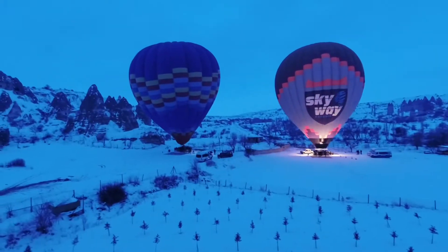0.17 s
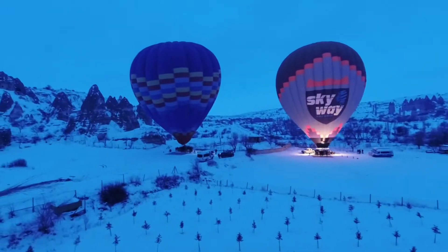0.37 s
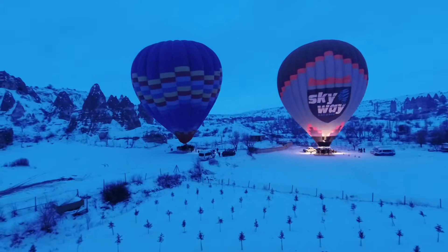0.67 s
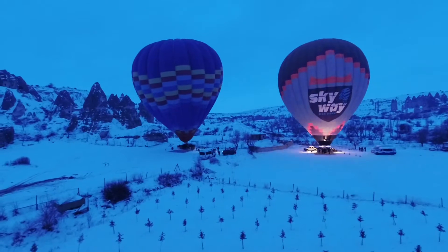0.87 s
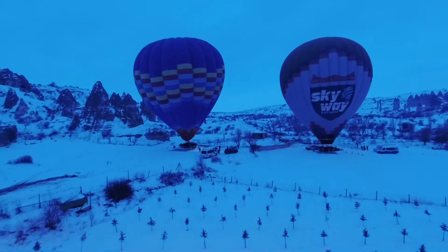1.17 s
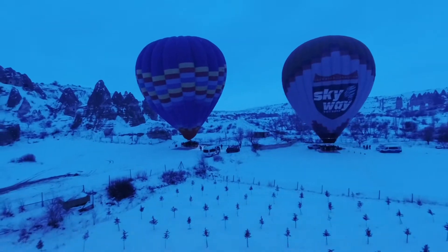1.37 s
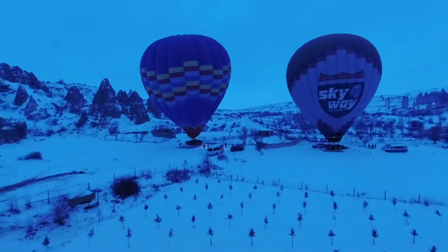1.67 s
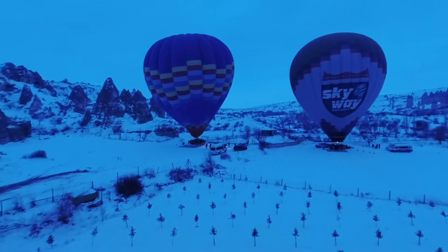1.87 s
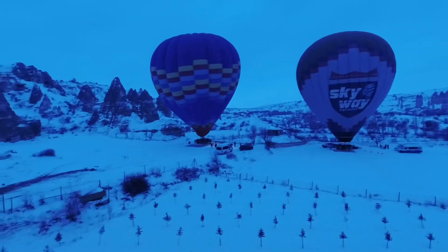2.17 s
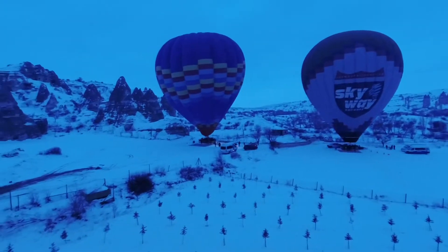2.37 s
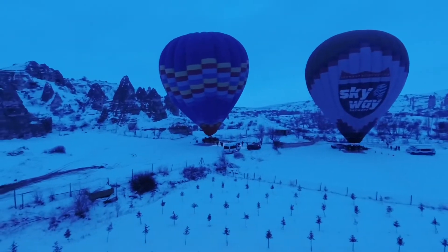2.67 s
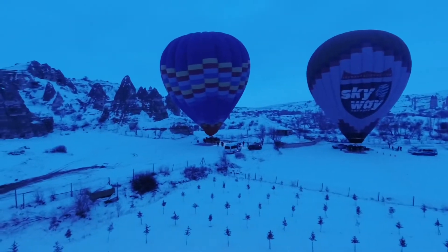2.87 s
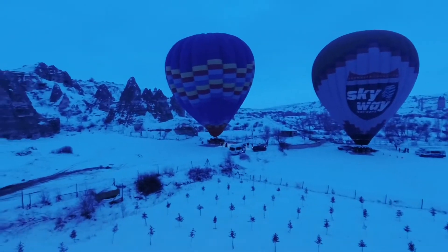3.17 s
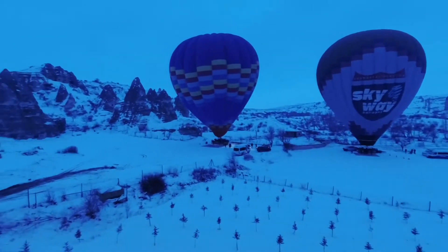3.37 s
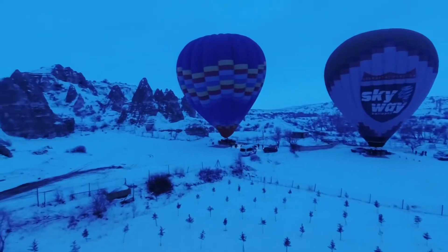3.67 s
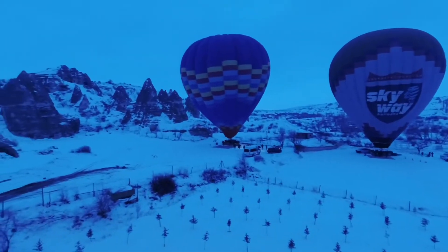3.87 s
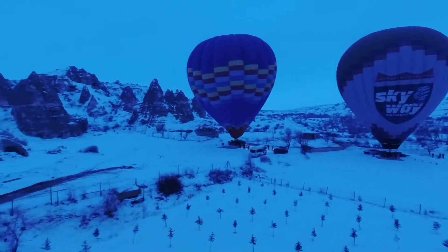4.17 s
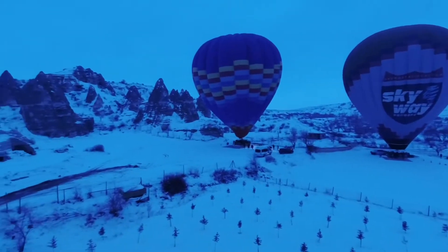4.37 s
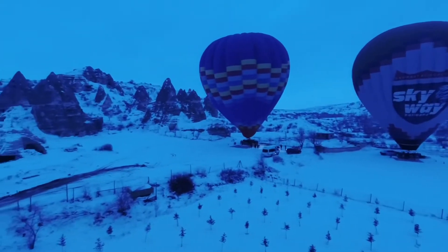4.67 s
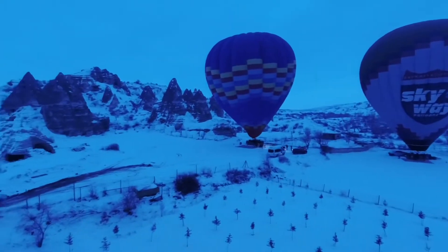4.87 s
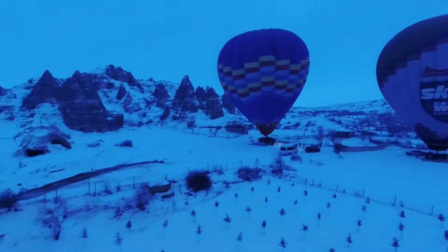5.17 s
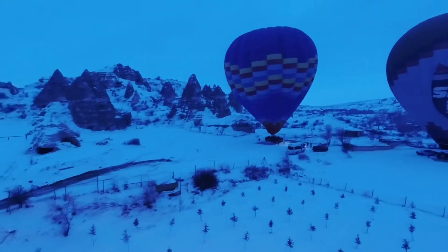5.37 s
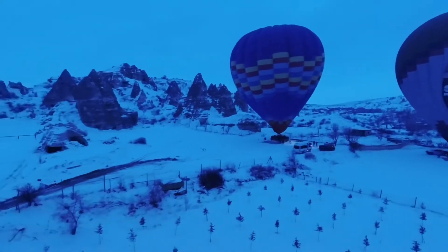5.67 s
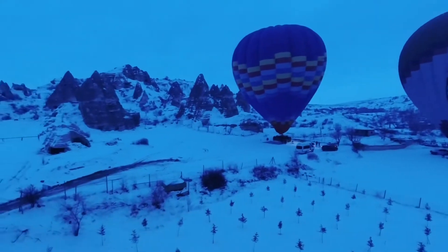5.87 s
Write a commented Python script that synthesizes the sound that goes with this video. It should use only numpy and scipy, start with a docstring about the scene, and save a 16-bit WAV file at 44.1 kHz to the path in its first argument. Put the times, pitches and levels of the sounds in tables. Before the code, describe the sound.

A balloon's gas burner roars outdoors with rumbling flame and hissing jets, eases, surges back harder twice, then cuts off abruptly to faint airy noise.

```python
"""A hot-air balloon burner blasts: a rumbling, roaring flame over the rush and hiss of its propane jets.
The blast eases, comes back harder twice, then is cut off; a faint, whistling noise bed follows.
Flame and jets are shaped noise on drawn level curves; gusts are short swells of uneven sine cycles.
The howl is a narrow noise band that sinks. Direct sound reaches the left microphone first;
an inverted near echo hollows out the roar."""
import sys
import numpy as np
from scipy import signal
from scipy.fft import rfft, irfft, next_fast_len
from scipy.io import wavfile
from scipy.ndimage import uniform_filter1d, map_coordinates

SR = 44100
rng = np.random.default_rng(int(sys.argv[2]) if len(sys.argv) > 2 else 0)


def pcm_store(signal):
    """Save signal as 16-bit PCM."""
    levels = np.round(np.clip(np.atleast_2d(signal), -1, 1) * 32767)
    wavfile.write(sys.argv[1], SR, levels.astype(np.int16).T)


N = 264820


# plume heave curve: time_s, curve_db
PLUME_HEAVE = [(0.0, -28.5), (0.3, -31), (1.9, -32.5), (2.2, -30.5), (2.64, -31.5), (2.9, -27.5),
               (3.5, -28.5), (3.8, -34), (4.2, -30), (4.63, -30), (4.91, -30), (5.31, -33.5), (5.92, -36.5)]
# layer spectra, only their shape counts: freq_hz, density_db_per_hz
HEAVE_SPECTRUM = [(10, -36), (22, -6), (32, -3), (43, 0.5), (62, 1.5), (85, -9), (130, -4.5), (300, -80)]
BOOM_SPECTRUM = [(40, -27), (80, -11), (105, 2.5), (125, 2.5), (155, 1), (200, -12), (260, -32), (700, -73)]
RUMBLE_SPECTRUM = [(80, -56), (180, -6), (220, -3.5), (265, 1), (315, -1.5), (380, -9), (470, -17.5),
                   (1200, -118)]
ROAR_SPECTRUM = [(150, -36), (330, 0), (430, 3.5), (550, 3), (660, -1), (730, -3), (800, -7.5), (1000, -36),
                 (2200, -84)]
RASP_SPECTRUM = [(400, -75), (800, 0.5), (870, 1.5), (940, -3.5), (1050, 3), (1160, -3.5), (1270, -2.5),
                 (1370, -15), (1600, -9.5), (3000, -82)]
RASP_FADES_DB_PER_S = 0.56  # as the listener drifts round the burner


def flame(size_db, vigour_db, force_db, flow_db):
    """Uneven burning: the plume heaves, large eddies boom and rumble, small ones roar and rasp."""
    flutter = wobble(35)
    heave_db = curves(PLUME_HEAVE)[0] - 0.3 + 0.75 * wobble(19)
    heave = amp(heave_db) * steadied(turbulence(HEAVE_SPECTRUM, patchy_db=-2.0), span_s=0.2)

    boom_db = -28.9 + 1.13 * size_db + 0.046 * flow_db + 0.15 * wobble(12) + 0.8 * flutter
    boom = amp(boom_db) * steadied(turbulence(BOOM_SPECTRUM, patchy_db=1.0), span_s=0.17)

    rumble_db = -29.6 + 0.85 * size_db + 0.2 * vigour_db - 0.09 * flow_db
    rumble_db = rumble_db + 1.33 * wobble(6.6) + 0.66 * flutter
    rumble = amp(rumble_db) * steadied(turbulence(RUMBLE_SPECTRUM, patchy_db=0.5), span_s=0.133)

    roar_db = -33.2 + 0.92 * vigour_db + 0.19 * flutter
    echoed_roar = near_echo(turbulence(ROAR_SPECTRUM, patchy_db=2.3))
    roar = amp(roar_db) * steadied(echoed_roar, span_s=0.12)

    rasp_db = -44.4 + 0.1 * size_db + 0.37 * vigour_db + 0.49 * force_db
    rasp_db = rasp_db + surges() - RASP_FADES_DB_PER_S * drift_s() + 0.5 * flutter
    rasp = amp(rasp_db) * steadied(turbulence(RASP_SPECTRUM, patchy_db=2.5), span_s=0.12)
    return heave + boom + rumble + roar + rasp


# harsh surges: start_s, scale_db (before attack and decay; a 0 dB row adds nothing)
SURGES = [(2.01, 2), (2.88, 4.5), (4.48, 0)]
SURGE_ATTACK_S, SURGE_DECAY_S = 0.058, 0.44


def surges():
    """Extra dB of brief harsh surges that rise and die away."""
    extra_db = np.zeros(N)
    for start_s, scale_db in SURGES:
        age_s = np.maximum(time_s() - start_s, 0)
        attack = 1 - np.exp(-age_s / SURGE_ATTACK_S)
        extra_db += scale_db * attack * np.exp(-age_s / SURGE_DECAY_S)
    return extra_db


# single large eddies: centre_s, pitch_hz, level_db (rms at the crest)
GUSTS = [(0.06, 289, -26), (0.07, 44, -26), (0.24, 292, -28.5), (0.72, 50.3, -27), (0.84, 266, -26.5),
         (0.97, 123, -32.5), (1.15, 116.7, -25), (1.473, 56, -27), (2.04, 55.4, -27), (2.13, 147, -28.5),
         (2.32, 54, -27), (2.83, 133.6, -24), (2.88, 36, -26), (2.98, 44, -25), (3.15, 240, -22.5),
         (3.49, 133, -23), (4.09, 40, -24.5), (4.1, 128, -32), (4.229, 96, -27), (4.481, 38, -31),
         (4.57, 44, -28), (4.6, 223.6, -28), (4.71, 155, -22), (4.75, 45, -40), (4.88, 140, -22.5),
         (5.22, 50, -30.5), (5.3, 109, -25.5), (5.41, 74.6, -23)]
GUST_HALF_S = 0.0793  # crest to silence, either side
GUST_STRAY_RAD, GUST_STRAYS_PER_CYCLE = 1, 0.388


def gusts():
    """Large eddies billow out of the flame as dull gusts: short swells of a few uneven cycles."""
    t = time_s()
    out = np.zeros(N)
    for centre_s, pitch_hz, level_db in GUSTS:
        near = np.abs(t - centre_s) < GUST_HALF_S
        age_s = t[near] - centre_s
        knots = rng.standard_normal(64)
        knot_index = (age_s + GUST_HALF_S) * pitch_hz * GUST_STRAYS_PER_CYCLE
        stray = map_coordinates(knots, [knot_index], mode="mirror")
        phase = 2 * np.pi * (pitch_hz * age_s + rng.random()) + GUST_STRAY_RAD * stray
        swell = np.cos(np.pi / 2 * age_s / GUST_HALF_S) ** 2
        out[near] += amp(level_db) * np.sqrt(2) * swell * np.sin(phase)
    return filtered(out, lead)


# layer spectra, only their shape counts: freq_hz, density_db_per_hz
RUSH_SPECTRUM = [(700, -12.5), (1400, -9.5), (1600, -4.5), (1950, -2), (2300, -0.5), (2750, -5.5),
                 (3300, -5), (3800, -11), (4600, -40), (8000, -71)]
SIZZLE_SPECTRUM = [(2000, -37), (3300, -40), (3850, 3), (4650, 4.5), (5100, -2), (5600, -28), (8000, -60)]
SPRAY_SPECTRUM = [(4000, -46), (5100, 1.5), (5750, 0), (6800, 1.5), (7500, -1.5), (9000, -7.5),
                  (12000, -45)]
HISS_SPECTRUM = [(4000, -47), (6800, -50), (7500, -6), (8100, -0.8), (9100, 1.5), (10100, -3.5),
                 (11500, -3), (12500, 3), (14000, 1.5), (15700, -7.5)]
FIZZ_SPECTRUM = [(5000, -49), (8500, -21), (11400, -22), (12500, -12), (14000, 7), (15700, 5.5)]
# sizzle curve, used about its own mean: time_s, curve_db
SIZZLE_CURVE = [(0.0, -53.5), (0.14, -51), (0.3, -52), (0.62, -50.5), (0.9, -48.5), (1.03, -46.5),
                (1.3, -50.5), (1.5, -51.5), (1.72, -57), (1.92, -56), (2.38, -53.5), (2.79, -56),
                (2.88, -48), (3.35, -47), (3.8, -49), (4.15, -52.5), (4.33, -54.5), (4.56, -45.5),
                (5.05, -44), (5.3, -45), (5.5, -49), (5.92, -52)]
# burner cans and coils ringing in the gas stream: centre_hz, width_hz, relative_db
CAN_MODES = [(1530, 110, -2), (2322, 70, 4), (4520, 90, -9), (4690, 130, -5)]
JET_PATCHY_DB = 5.5  # depth of random patches in the noise, before the ceiling
SPRAY_GAINS_DB_PER_S = 0.25  # as the listener drifts round the burner


def jets(force_db, flow_db):
    """Propane rushes from the nozzles and rings the burner; the finest fizz follows the flow weakly."""
    flicker = wobble(20)
    sizzling_db, = swings(SIZZLE_CURVE)

    rush_db = -47.5 + 1.0 * force_db + 0.29 * surges() + 1.4 * flicker
    rush = amp(rush_db) * steadied(turbulence(RUSH_SPECTRUM, JET_PATCHY_DB), span_s=0.58)

    cans_db = -55.5 + 1.2 * force_db + 1.2 * wobble(6.4)
    cans = amp(cans_db) * wavering(ringing(CAN_MODES))

    sizzle_db = -57.5 + sizzling_db + 0.43 * flicker + 0.6 * wobble(18)
    sizzle = amp(sizzle_db) * steadied(turbulence(SIZZLE_SPECTRUM, JET_PATCHY_DB), span_s=0.27)

    spray_db = -62.0 + 1.25 * sizzling_db + SPRAY_GAINS_DB_PER_S * drift_s() + 0.49 * flicker
    spray = amp(spray_db) * turbulence(SPRAY_SPECTRUM, JET_PATCHY_DB)

    hiss_db = -48.0 + 1.29 * flow_db + 0.28 * flicker + 0.37 * wobble(17)
    hiss = amp(hiss_db) * turbulence(HISS_SPECTRUM, patchy_db=8.0)

    fizz_db = -48.5 + 0.42 * flow_db + 0.3 * flicker + 0.4 * wobble(16)
    fizz = amp(fizz_db) * turbulence(FIZZ_SPECTRUM, patchy_db=2.0)
    return rush + cans + sizzle + spray + hiss + fizz


def ringing(modes):
    """Mildly patchy noise heard through resonances, rms 1."""
    drive_spectrum = [(500, -24), (1400, 2), (11500, -13), (13000, -25)]  # freq_hz, density_db_per_hz
    drive = turbulence(drive_spectrum, patchy_db=-3.5)
    return unit(filtered(drive, lambda hz: resonances(modes, hz)))


def resonances(modes, hz):
    """Summed response of damped resonances, alternating in sign."""
    total = 0
    for k, (centre_hz, width_hz, relative_db) in enumerate(modes):
        damping = 1j * hz * width_hz
        total = total + (-1) ** k * amp(relative_db) * damping / (centre_hz ** 2 - hz ** 2 + damping)
    return total


CAN_WAVER_SHARE, CAN_WAVER_KNOTS_PER_S = 0.008, 3


def wavering(x):
    """Uneven heat makes a ringing drift slightly sharp and flat."""
    offset = np.cumsum(CAN_WAVER_SHARE * wobble(CAN_WAVER_KNOTS_PER_S))
    source = np.arange(N) + offset
    return np.array([map_coordinates(side, [source], mode="mirror") for side in x])


HOWL_FROM_S, HOWL_SINK_S = 2.95, 2.2
HOWL_START_HZ, HOWL_END_HZ = 1871, 1615
HOWL_BASE_DB, HOWL_DB_PER_FORCE_DB = -58, 2.4


def howl(force_db, width_hz):
    """A narrow noise band, loud in the harder blasts, sinks in pitch; left microphone first."""
    pitch_hz = np.interp(time_s() - HOWL_FROM_S, [0, HOWL_SINK_S], [HOWL_START_HZ, HOWL_END_HZ])
    phase = 2 * np.pi * np.cumsum(pitch_hz) / SR + lead_rad(pitch_hz)
    band = wobble(width_hz) * np.cos(phase) + wobble(width_hz) * np.sin(phase)
    return amp(HOWL_BASE_DB + HOWL_DB_PER_FORCE_DB * force_db) * steadied(band, span_s=0.086)


# noise bed spectrum, only its shape counts: freq_hz, density_db_per_hz
BED_SPECTRUM = [(20, 10), (70, 5), (170, 0), (420, -14), (620, -12), (900, -21), (1300, -28), (2600, -22),
                (4300, -31), (5200, -38), (6300, -34), (8300, -31), (9300, -46), (12500, -36), (13500, -60)]
# faint whistling bands: centre_hz, width_hz, relative_db
WHISTLE_MODES = [(1650, 160, 0), (4250, 250, -8)]


def noise_bed():
    """Faint patchy noise with whistling bands."""
    return amp(-35.0) * turbulence(BED_SPECTRUM, patchy_db=9.0) + amp(-50.5) * ringing(WHISTLE_MODES)


# share of sound with a fixed left lead, the rest scattered: freq_hz, power_share
DIRECT_SHARE = [(120, 1), (300, 0.99), (460, 0.96), (700, 0.98), (1100, 0.94), (1500, .81), (2400, 0.84),
                (2700, 0.97), (2900, 1), (3200, 0.95), (3600, 0.6), (4150, 0.25), (4700, 0.58),
                (5700, 0.14), (9000, 0.37), (10800, 0.1), (12300, 0.25), (15500, 0.2)]
PATCH_CEILING_DB = 3.0  # keeps the grain even


def turbulence(spectrum, patchy_db):
    """Stereo noise, rms 1, in patches of random gain; its direct part reaches the left microphone first."""
    grid = signal.stft(rng.standard_normal((3, N)), nperseg=1024)[2]
    patches = uniform_filter1d(rng.standard_normal(grid.shape[1:]), size=3, axis=0)
    patches = uniform_filter1d(patches, size=9, axis=1)
    patch_db = np.minimum(patchy_db * unit(patches), PATCH_CEILING_DB)
    noise = signal.istft(grid * amp(patch_db), nperseg=1024)[1][:, :N]

    def share(hz):
        return np.clip(along(DIRECT_SHARE, hz), 0, 1)

    direct = filtered(noise[0], lambda hz: np.sqrt(share(hz)) * lead(hz))
    scattered = filtered(noise[1:], lambda hz: np.sqrt(1 - share(hz)))
    return unit(filtered(direct + scattered, lambda hz: amp(along(spectrum, hz))))


# near echo as the listener drifts: time_s, lag_ms, strength_0_to_1
ECHO = [(0, 2.2, 0.32), (1, 2.26, 0.6), (2.7, 2.14, 0.77), (3.3, 2.26, 0.39), (6, 2.3, 0.6)]


def near_echo(x):
    """A nearby surface's inverted echo, its lag drifting, cuts a row of moving notches."""
    n = np.arange(N)
    lag_ms, strength = curves(ECHO)
    source = n - lag_ms * SR / 1000
    echo = np.array([np.interp(source, n, side) for side in x])
    return unit(x - strength * echo)


# left microphone lead, bent by the body between the two: freq_hz, phase_rad
LEFT_LEAD = [(0, 0), (400, 0.4), (600, 0.78), (850, 0.36), (1000, 1.31), (1400, 1.78), (1600, 2), (1900, 2),
             (2150, 2.5), (2350, 2.45), (2650, 3.05), (3000, 3.5), (3800, 3.5), (4650, 4), (7400, 10),
             (9300, 9), (12000, 14), (14000, 14.5)]


def lead_rad(hz):
    """Half the lead forward on the left, half back on the right."""
    return 0.5 * np.interp(hz, *np.transpose(LEFT_LEAD)) * np.array([[1], [-1]])


def lead(hz):
    """Phase turn of each microphone for direct sound."""
    return np.exp(1j * lead_rad(hz))


LEAD_GROWS_MS_PER_S = 0.0037


def turning(x):
    """As the listener drifts, the left side comes ever earlier and the right ever later."""
    shift = LEAD_GROWS_MS_PER_S * drift_s() * SR / 1000 / 2  # samples per side
    left = map_coordinates(x[0], [np.arange(N) + shift], order=5, mode="mirror")
    right = map_coordinates(x[1], [np.arange(N) - shift], order=5, mode="mirror")
    return np.array([left, right])


def steadied(x, span_s):
    """Noise with its slow chance swells evened out."""
    power = uniform_filter1d(np.mean(x ** 2, axis=0), int(span_s * SR))
    return x / np.sqrt(np.abs(power) + 1e-9)


def amp(db):
    """Decibels to gain."""
    return 10 ** (np.asarray(db) / 20)


def unit(x):
    """Scaled to rms 1."""
    return x / np.sqrt(np.mean(x ** 2) + 1e-20)


def time_s():
    """Time of each sample."""
    return np.arange(N) / SR


def drift_s():
    """Time from the middle of the scene, negative before it."""
    return (np.arange(N) - N / 2) / SR


def along(points, hz):
    """(freq_hz, value) points read on a log frequency axis."""
    freq_hz, value = np.transpose(points)
    return np.interp(np.log(hz + 1), np.log(freq_hz + 1), value)


def curves(rows):
    """One value per sample for each column after the time."""
    knot_s, *columns = np.transpose(rows)
    return [np.interp(time_s(), knot_s, column) for column in columns]


def swings(rows):
    """Each level column in dB about its own mean over time."""
    return [db - db.mean() for db in curves(rows)]


def wobble(knots_per_s):
    """A smooth random curve through random knots."""
    knots = rng.standard_normal(int(N * knots_per_s / SR) + 4)
    return map_coordinates(knots, [np.arange(N) * knots_per_s / SR])


def filtered(x, response):
    """x times a complex response of frequency."""
    size = next_fast_len(N + SR // 2)
    spectrum = rfft(x, size) * response(np.fft.rfftfreq(size, 1 / SR))
    return irfft(spectrum, size)[..., :N]


# control curves, each used about its own mean
# flame size, large eddies: time_s, size_db
FLAME_SIZE = [(0.0, -21.5), (0.52, -23), (0.72, -22.5), (0.9, -19), (1.04, -25), (1.22, -23), (1.72, -25.5),
              (1.88, -28), (2.1, -21.5), (2.25, -23), (2.48, -25), (2.6, -30), (2.74, -28.5), (2.8, -24.5),
              (3.14, -20.5), (3.26, -26), (3.36, -22), (3.62, -25), (4.0, -21), (4.23, -23.5),
              (4.34, -24.5), (4.6, -20.5), (4.9, -25), (5.06, -24.5), (5.32, -25.5), (5.92, -27.5)]
# vigour of burning, roar: time_s, vigour_db
VIGOUR = [(0.0, -30.5), (0.68, -34.5), (0.91, -31), (0.97, -40.5), (1.14, -36.5), (1.27, -32.5),
          (1.74, -36), (2.14, -33.5), (2.6, -39), (2.83, -39), (2.89, -29), (3.2, -27), (3.26, -31),
          (3.7, -30.5), (3.87, -34), (3.94, -30.5), (4.41, -32), (4.57, -27.5), (4.91, -31), (4.99, -34),
          (5.4, -32.5), (5.72, -30.5), (5.92, -32.5)]
# gas jets, rush and hiss: time_s, force_db, flow_db
JET = [(0.0, -51.5, -50), (0.12, -48, -48.5), (0.3, -51, -49), (0.52, -52.5, -50), (0.63, -48.5, -47.5),
       (0.88, -49, -47), (1.02, -46.5, -42.5), (1.28, -50.5, -47.5), (1.6, -52.5, -48.5),
       (1.88, -55.5, -53.5), (2.05, -51.5, -51), (2.3, -52.5, -51), (2.36, -50.5, -46.5),
       (2.82, -53.5, -48.5), (2.89, -46, -44.5), (3.33, -44, -42.5), (3.85, -46, -46.5),
       (3.99, -44.5, -48.5), (4.35, -49, -51.5), (4.57, -44, -44), (4.81, -43.5, -42), (5.3, -47.5, -42.5),
       (5.42, -48, -44.5), (5.92, -49.5, -51.5)]
STOP_S, STOP_FADE_S = 5.935, 0.0092  # fade centred on the stop


def scene():
    """The blast is cut off within about a hundredth of a second and a faint, whistling noise bed follows."""
    t = time_s()
    size_db, = swings(FLAME_SIZE)
    vigour_db, = swings(VIGOUR)
    force_db, flow_db = swings(JET)
    burner = flame(size_db, vigour_db, force_db, flow_db) + jets(force_db, flow_db)
    burner = burner + howl(force_db, width_hz=150)  # wobble knots per second
    blast = turning(burner) + gusts()
    blast_share = np.clip((STOP_S - t) / STOP_FADE_S + 0.5, 0, 1)
    soft_edges = np.clip(np.minimum(t, t[-1] - t) / 0.002, 0, 1)
    return soft_edges * (blast_share * blast + (1 - blast_share) * noise_bed())


BAND_LIMIT_HZ = 15800


def record(dry):
    """The recorder keeps nothing above its band limit."""
    return filtered(dry, lambda hz: hz < BAND_LIMIT_HZ)


dry = scene()
out = record(dry)
pcm_store(out)
```